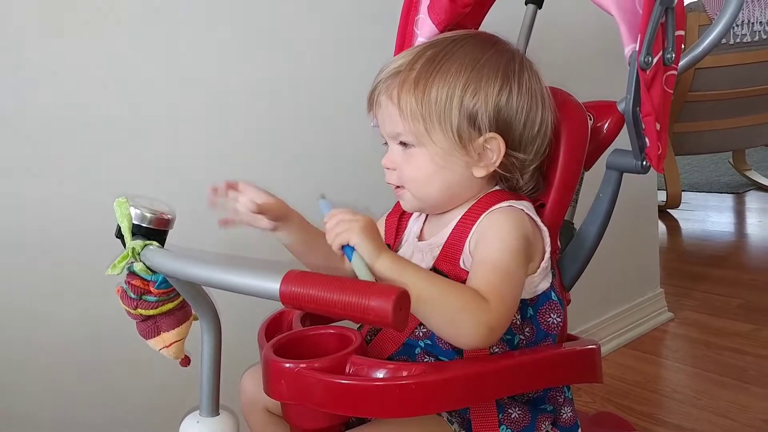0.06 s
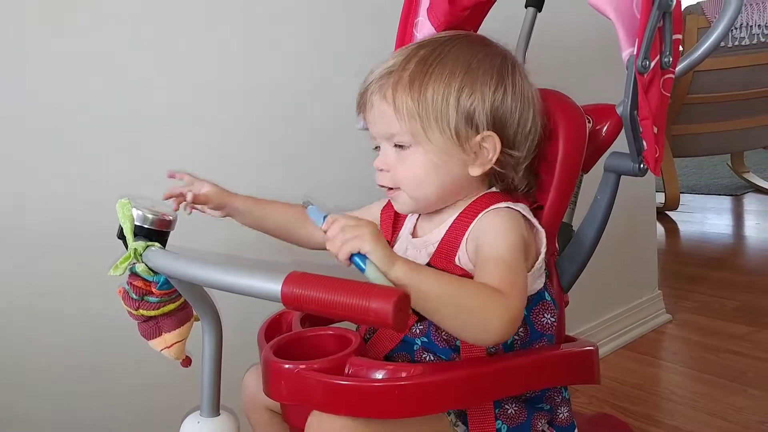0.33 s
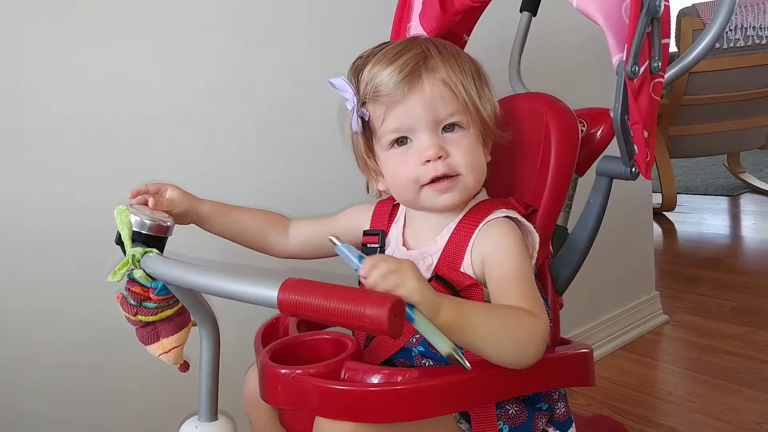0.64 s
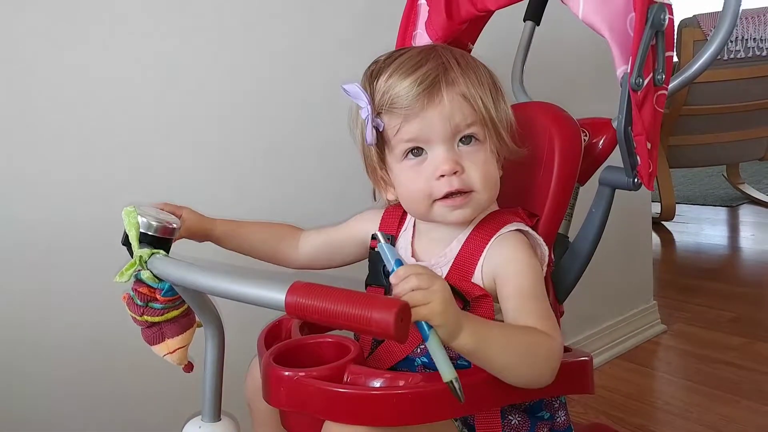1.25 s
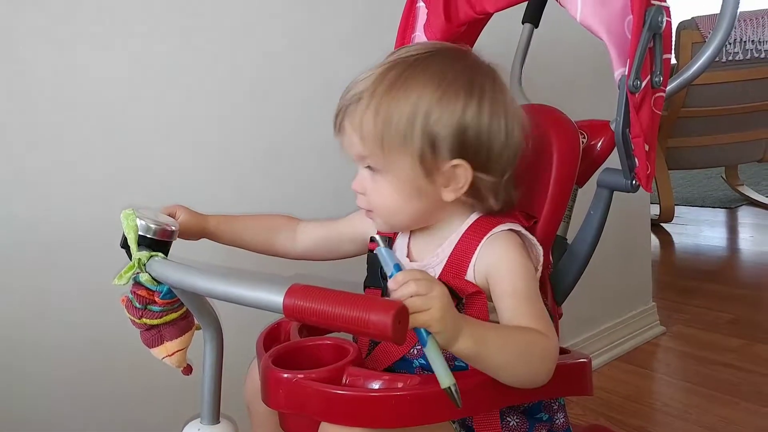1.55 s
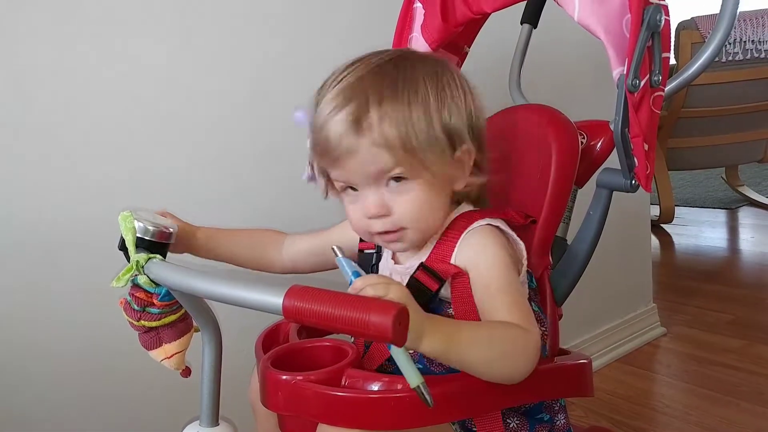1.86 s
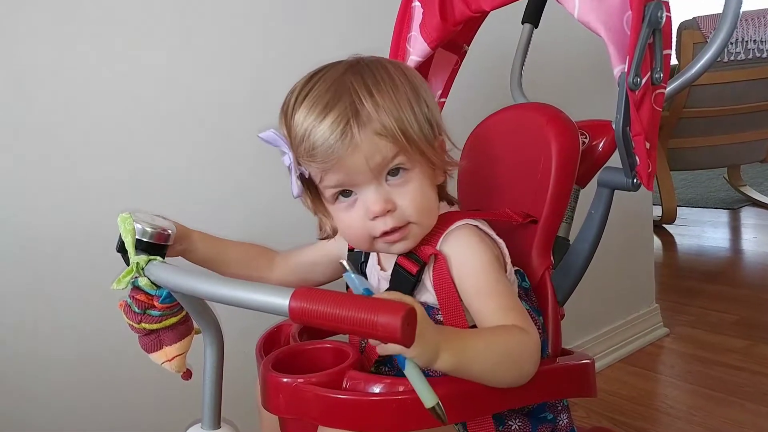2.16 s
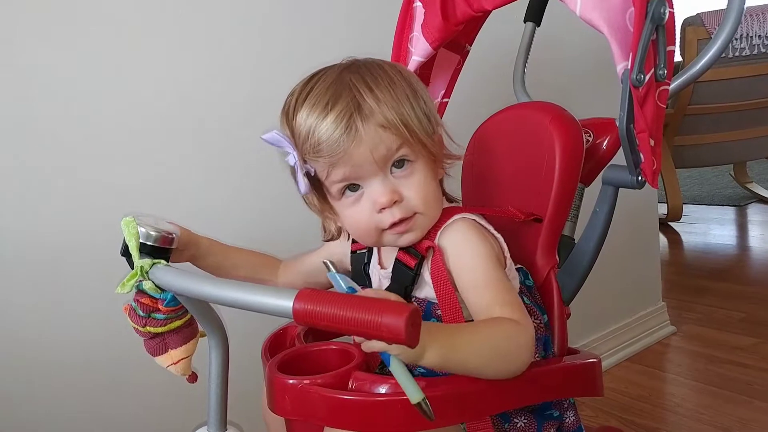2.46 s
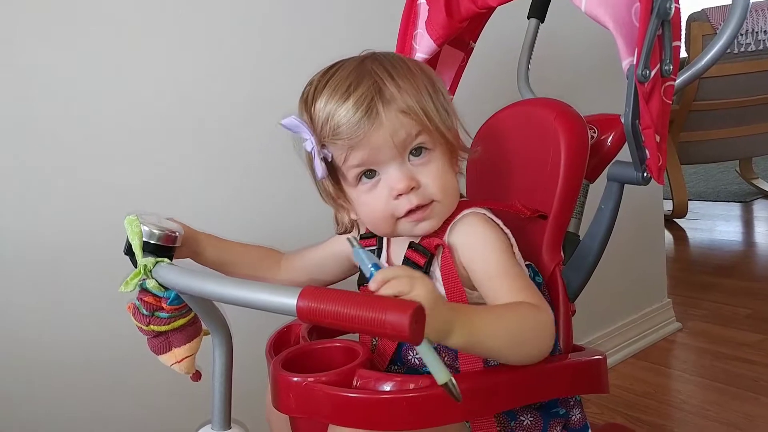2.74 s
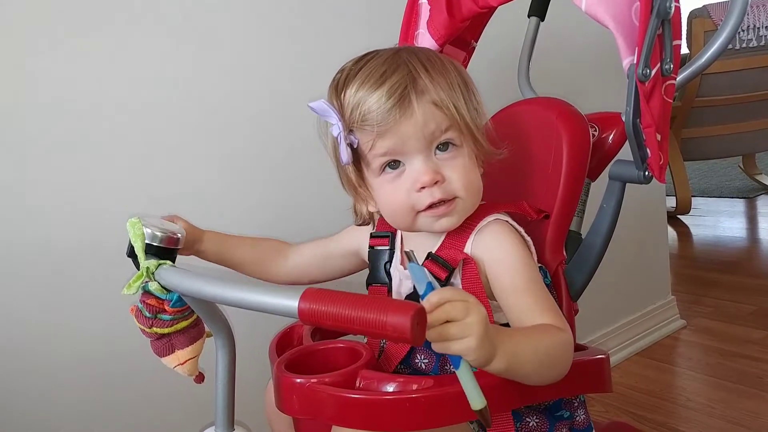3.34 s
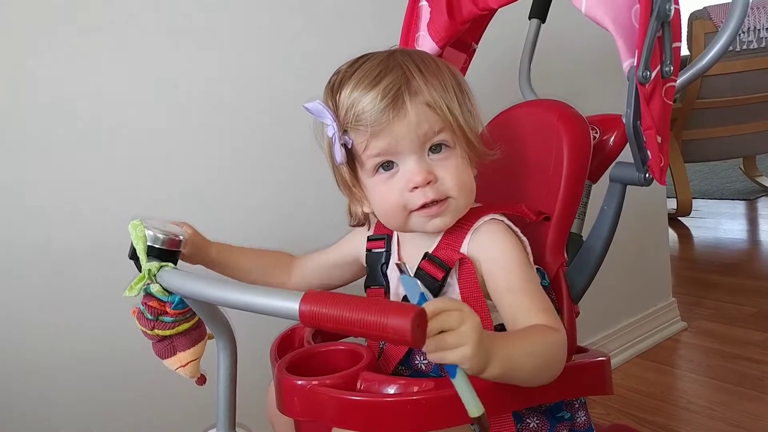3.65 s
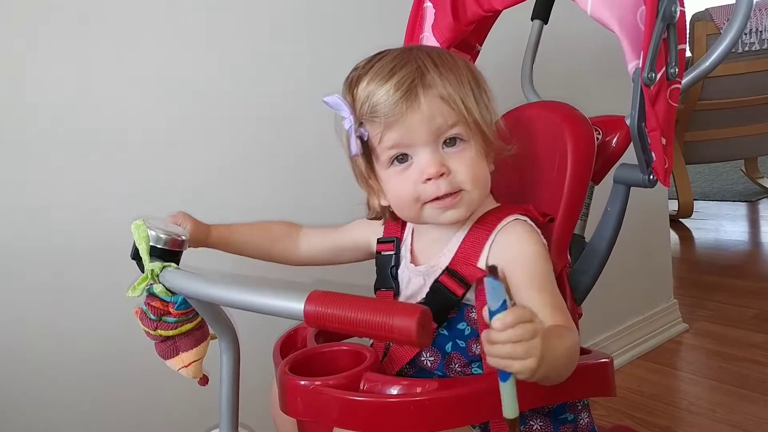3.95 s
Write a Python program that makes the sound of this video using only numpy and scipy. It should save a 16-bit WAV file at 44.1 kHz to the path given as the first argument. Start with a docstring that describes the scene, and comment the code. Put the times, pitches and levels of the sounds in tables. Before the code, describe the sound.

A small metal bell on a trike clicks faintly, then dings brightly several times, close up.

```python
"""A living room, where a small steel bell on a trike's handlebar is rung by hand, close up.
The lever clicks once, then flings the striker against the dome in quick clusters of bright dings.
The dome's paired modes beat and shimmer, the works rattle, the mount knocks and the room answers.
Faint handling sounds sit on a bed of air and low hum; a fast limiter catches the loudest dings."""
import sys
import numpy as np
from scipy import signal
from scipy.fft import rfft, irfft, next_fast_len
from scipy.io import wavfile
from scipy.ndimage import uniform_filter1d, minimum_filter1d, map_coordinates

SR = 44100
rng = np.random.default_rng(int(sys.argv[2]) if len(sys.argv) > 2 else 0)


def persist_wave(psi):
    """Save psi, clipped to +-1, as 16-bit WAV."""
    counts = np.round(np.clip(psi, -1, 1) * 32767).astype(np.int16)
    wavfile.write(sys.argv[1], SR, np.atleast_2d(counts).T)


N = 176400

# the dome's partials, most in close pairs: f/Hz
MODE_HZ = [1305, 2611, 3137.6, 3124, 4441, 5398.3, 5339.4, 6277, 8071.3, 7977, 11206, 11030, 13468, 14802,
           14520]
# their voicing, in the same order: level/dB, t60/s, left-right/dB, share of a strike's twin boost
DOME_MODES = [(-29, 1.3, -5.5, 0.21), (-61, 1.4, -3, 1), (-18, 1.81, -13.5, 0.2), (-34, 1.8, 15.5, 1),
              (-33.5, 0.72, -7, 1), (-12.5, 1.13, -8.5, 0.15), (-17.5, 1.57, 0, 0.88),
              (-43, 1.1, -10.5, 0.86), (-9.5, 0.62, -9.5, 0), (-20.5, 0.62, 18, 1), (-10, 0.32, 16, 0.33),
              (-15, 0.29, 11, 1), (-48, 0.43, -1.5, 0.88), (-5.5, 0.13, 11.5, 0.18), (-29, .25, -2.5, 1)]
# striker hits, each coloured by where it lands:
# t/s, ring/dB, twin boost/dB, tilt/(dB per octave), middle boost/dB, clack/dB, share of old ring kept
STRIKES = [(1.9932, 0.5, -6.5, 2, 4.5, -16.5, 1), (2.051, -0.5, -8, 1.5, -13, -28, 0.39),
           (3.0105, -4, -24.5, -2, 6.5, -25.5, 1), (3.0423, -3.5, 7.5, 0.5, 4.5, -14, 0.77),
           (3.0723, 4.5, 3, -1, -7, -13, 0.6), (3.3654, -5, -16, 9.5, 13, -14.5, 0.17),
           (3.412, 1, -7.5, 3, 1.5, -19.5, 0.32), (3.599, 3.5, 1.5, -0.5, 2, -9, 0.38),
           (3.666, 0.5, -7, 3.5, 9, -21, 0.83), (3.791, -1.5, 1, -0.5, -2, -20, 0.19)]
# the works rattling while the striker spins: t/s, level/dB, length/s
SPINS = [(1.995, -36.5, 0.077), (3.02, -27.5, 0.074), (3.37, -36.5, 0.067), (3.603, -25, 0.082)]
# the lever moving without a ding: t/s, level/dB, length/s
SCRAPES = [(1.945, -57, 0.044), (2.345, -51, 0.011), (2.606, -56, 0.013), (2.835, -66, .02),
           (3.5596, -32, .008), (3.9811, -47, .01)]
# colour of the clacks, rattles and scrapes: f/Hz, level/dB
WORKS_EQ = [(150, -27.5), (350, -13.5), (500, -3.5), (800, -11), (1500, -8.5), (2400, -7), (3400, -12.5),
            (4500, -3.5), (7000, 6), (9000, -6.5), (10500, 5), (13000, -5), (14700, 4.5), (16000, -16.5)]
# the housing's broad resonances: f/Hz, half width/Hz, gain/dB
HOUSING_PEAKS = [(520, 26, 3.5), (1850, 130, -0.5), (4550, 370, 6.5), (7150, 230, 3.5)]
# colour of the lever's click: f/Hz, level/dB
CLICK_EQ = [(590, -48), (1000, -24), (1320, -31), (1830, -22), (3890, -29), (5190, -7), (6700, -4),
            (8750, -14.5), (10400, -6.5), (16000, -32)]
# fingers brushing the bell: t/s, level/dB, length/s
RUBS = [(.6, -65.5, 0.11), (.72, -66.5, 0.097), (1.19, -70, 0.076)]
# colour of the brushing: f/Hz, level/dB
RUB_EQ = [(1500, -20), (4500, -5.5), (5800, -7), (6900, 4.5), (7800, -14), (11000, -22), (16000, -36)]
# a fingernail on the damped dome: t/s, level/dB
NAIL_TAPS = [(0.669, -56), (1.18, -65), (1.56, -68)]
# tiny plastic creaks: t/s, level/dB, f/Hz
CREAKS = [(0.602, -47, 1660), (.682, -45, 1586)]
# faint far-off tones: centre t/s, level/dB, f/Hz, half length/s
FAR_TONES = [(0.018, -62.5, 2390, 0.023), (0.173, -73, 2400, 0.18), (.47, -63.5, 2200, 0.061)]
# the room's decay: f/Hz, t60/s
ROOM_DECAY = [(300, 0.66), (2000, 0.48), (7000, 0.31), (11000, 0.29), (15000, .27)]
# colour of the room's air: f/Hz, level/dB
AIR_EQ = [(25, -34.5), (50, -5.5), (70, -1.5), (90, -12), (127, -22.5), (180, -18.5), (270, -16),
          (400, -24.5), (550, -14.5), (750, -22.5), (1000, -32.5), (1500, -38.5), (2200, -40.5),
          (4000, -47), (7000, -44), (9000, -51.5), (10500, -41), (12500, -51.5), (16000, -52)]
# the air's stereo image, narrow lows and wide highs: f/Hz, left-right correlation
AIR_CORRELATION = [(60, .94), (150, 1), (600, 0.64), (2000, 0.071), (8000, 0.042)]

MIDDLE_HZ, MIDDLE_OCTAVES = 5660, 0.14  # the band that answers most to where the striker lands
SPOT_DB = 2.1  # no two hits land on quite the same spot
BLOOM_DB, BLOOM_S = 6, 0.049  # the ring fills out just after each hit
ATTACK_S, LOW_ATTACK_S, LOW_BELOW_HZ = 0.00086, 0.0065, 4000  # lows build while the striker chatters
SPREAD_RAD, DRIFT_RAD = 1.61, 0.67  # a mode's left-right phase gap, and its scatter per hit
CLACK_T60, TICKS_PER_S, SCRAPE_TOP_HZ = 0.029, 730, 10040
WORKS_PAN_DB, WORKS_CROSSFEED = -1, 0.17
RIPPLE_DB, RIPPLE_STEP_HZ, RIPPLE_FULL_HZ = 3.5, 50, 1200  # the housing's fine resonances
KNOCK_HZ, KNOCK_T60, KNOCK_DB = 510, 0.076, -36.5
CLICK_AT_S, CLICK_DB, CLICK_T60, CLICK_PAN_DB = 0.1167, -22.5, 0.031, -4
NAIL_T60, NAIL_ABOVE_HZ, CREAK_T60 = 0.071, 7500, 0.015
RING_WET_DB, WORKS_WET_DB, LIGHT_WET_DB = -12.5, -1, -1
AIR_DB, HUM_HZ, HUM_WIDTH_HZ, HUM_DB = -49, 75.7, 10.5, -53
CEILING, HOLD_S, TOP_HZ = 1.0, 0.0017, 16300


def dome():
    """The hero ding: each hit keeps a share of the old ring, feeds every mode and nudges its phase."""
    t, out = np.arange(N) / SR, np.zeros((2, N))
    starts = [round(s * SR) for s, *_ in STRIKES] + [N]
    for hz, (db, t60, pan_db, twin) in zip(MODE_HZ, DOME_MODES):
        octaves = np.log2(hz / MIDDLE_HZ)
        middle = np.exp(-(octaves / MIDDLE_OCTAVES) ** 2)
        attack_s = LOW_ATTACK_S if hz < LOW_BELOW_HZ else ATTACK_S
        phase = rng.uniform(0, 2 * np.pi)
        spread = rng.choice([-1, 1]) * SPREAD_RAD
        ringing = 0
        for strike, a, b in zip(STRIKES, starts, starts[1:]):
            _, ring_db, twin_db, tilt_db, middle_db, _, kept = strike
            age = t[:b - a]
            old_ring = kept * ringing
            colour_db = twin * twin_db + tilt_db * octaves + middle_db * middle
            hit_db = db + ring_db + colour_db + SPOT_DB * rng.standard_normal()
            bloom = amp(hit_db - BLOOM_DB * np.exp(-age / BLOOM_S))
            new_ring = bloom * (1 - np.exp(-age / attack_s))
            envelope = np.hypot(old_ring, new_ring) * np.exp(-np.log(1000) * age / t60)
            phase += rng.uniform(-1, 1) * np.arctan2(bloom[0], old_ring)
            stereo_phase = np.array([[0.5], [-0.5]]) * (spread + DRIFT_RAD * rng.standard_normal())
            out[:, a:b] += pan(pan_db) * envelope * np.sin(2 * np.pi * hz * t[a:b] + phase + stereo_phase)
            ringing = envelope[-1]
    return out


def works():
    """The mechanical layer: striker clacks, spinning gears and duller lever scrapes in one housing."""
    clacks = sum(amp(db) * fall(s, CLACK_T60) for s, *_, db, _ in STRIKES)
    scrapes = noise(WORKS_EQ) * rattle(SCRAPES)
    dull_scrapes = filtered(scrapes, lambda hz: 1 / (1 + (hz / SCRAPE_TOP_HZ) ** 4))
    drive = noise(WORKS_EQ) * np.hypot(clacks, rattle(SPINS)) + dull_scrapes
    return pan(WORKS_PAN_DB) * housing(drive + WORKS_CROSSFEED * drive[::-1])


def rattle(bursts):
    """A gritty envelope: tiny uneven ticks, gated into bursts."""
    t = np.arange(N) / SR
    ticks = (rng.random(N) < TICKS_PER_S / SR) * rng.uniform(0.17, 1, N)
    grit = unit(signal.lfilter([1], [1, -np.exp(-1 / (0.0021 * SR))], ticks))
    gate = np.zeros(N)
    for s, db, length in bursts:
        attack = np.clip((t - s) / 0.0033, 0, 1)
        release = np.exp(-np.maximum(t - s - length, 0) / 0.01)
        gate += amp(db) * attack * release
    return (0.13 + grit) * gate


def housing(x, size=8192):
    """The housing adds body: a few broad resonances, with many finer ones in the treble."""
    hz = np.fft.rfftfreq(size, 1 / SR)
    ripple = map_coordinates(rng.standard_normal(2000), [hz / RIPPLE_STEP_HZ], mode="mirror")
    fine_db = RIPPLE_DB * ripple * np.minimum(1, hz / RIPPLE_FULL_HZ)
    broad_db = sum(db / (1 + ((hz - f) / width) ** 2) for f, width, db in HOUSING_PEAKS)
    # minimum phase, so the ringing follows each transient
    cepstrum = irfft(np.log(amp(fine_db + broad_db)))
    fold = np.r_[1, np.full(size // 2 - 1, 2), np.zeros(size // 2)]
    impulse = irfft(np.exp(rfft(cepstrum * fold)))
    return signal.fftconvolve(x, impulse[None], axes=1)[:, :N]


def mount_knocks():
    """Every hit gives the mount a short, hollow knock."""
    t = np.arange(N) / SR
    knocks = sum(fall(s, KNOCK_T60) * np.sin(2 * np.pi * KNOCK_HZ * (t - s)) for s, *_ in STRIKES)
    return amp(KNOCK_DB) * knocks


def lever_click():
    """A light plastic click that leaves the dome silent."""
    return pan(CLICK_PAN_DB) * amp(CLICK_DB) * fall(CLICK_AT_S, CLICK_T60) * noise(CLICK_EQ)


def handling():
    """Close foley: fingers brush the bell, a nail tinkles its top modes and plastic creaks."""
    t = np.arange(N) / SR
    top_modes = unit(sum(np.sin(2 * np.pi * hz * t) for hz in MODE_HZ if hz > NAIL_ABOVE_HZ))
    tinkles = top_modes * sum(amp(db) * fall(s, NAIL_T60) for s, db in NAIL_TAPS)
    creaks = sum(amp(db) * fall(s, CREAK_T60) * np.sin(2 * np.pi * hz * t) for s, db, hz in CREAKS)
    return noise(RUB_EQ) * rattle(RUBS) + tinkles + creaks


def far_tones():
    """Faint pure tones swell and fade in the distance."""
    t = np.arange(N) / SR
    return sum(amp(db) * np.exp(-((t - s) / half) ** 2) * np.sin(2 * np.pi * hz * t)
               for s, db, hz, half in FAR_TONES)


def in_room(x, wet_db):
    """The direct sound plus a short room tail whose treble dies first."""
    hz, t, spectra = signal.stft(rng.standard_normal((2, SR * 3 // 4)), SR, nperseg=256)
    decay = np.exp(-np.log(1000) * t / along(ROOM_DECAY, hz)[:, None])
    _, tail = signal.istft(spectra * decay, SR, nperseg=256)
    tail = np.pad(tail, ((0, 0), (130, 0)))  # 3 ms pre-delay
    return x + amp(wet_db) * signal.fftconvolve(x, tail / np.linalg.norm(tail[0]), axes=1)[:, :N]


def room_tone():
    """The bed: soft air over a low, wavering hum."""
    def mid_side_gains(hz):
        angle = np.arccos(along(AIR_CORRELATION, hz)) / 2
        return np.array([np.cos(angle), np.sin(angle)])

    mid, side = filtered(noise(AIR_EQ), mid_side_gains)
    air = np.array([mid + side, mid - side])
    hum = filtered(rng.standard_normal(N), lambda hz: 1 / (1 + ((hz - HUM_HZ) / HUM_WIDTH_HZ) ** 2))
    return amp(AIR_DB) * unit(air) + amp(HUM_DB) * unit(hum)


def amp(db):
    """Decibels to gain."""
    return 10 ** (np.asarray(db) / 20)


def unit(x):
    """x at an rms of 1."""
    return x / np.sqrt(np.mean(x ** 2) + 1e-20)


def along(points, hz):
    """A breakpoint curve read on a log frequency axis."""
    point_hz, values = np.transpose(points)
    return np.interp(np.log(hz + 1), np.log(point_hz + 1), values)


def pan(db):
    """Stereo gains for a level difference; positive leans left."""
    return amp(np.array([[db], [-db]]) / 2)


def filtered(x, response):
    """Zero-phase EQ with the gain response(hz)."""
    size = next_fast_len(N + SR // 2)
    return irfft(rfft(x, size) * response(np.fft.rfftfreq(size, 1 / SR)), size)[..., :N]


def noise(eq):
    """Wide stereo noise, coloured by an EQ curve, at an rms of 1."""
    return unit(filtered(rng.standard_normal((2, N)), lambda hz: amp(along(eq, hz))))


def fall(s, t60):
    """A percussive envelope that jumps to 1 at time s and dies away."""
    age = np.arange(N) / SR - s
    return (age >= 0) * np.exp(-np.log(1000) * np.maximum(age, 0) / t60)


def scene():
    """The mix: a fairly dry ring up front, wetter mechanics and light details, room tone beneath."""
    light = lever_click() + handling() + far_tones()
    ring = in_room(dome(), RING_WET_DB)
    mechanics = in_room(works() + mount_knocks(), WORKS_WET_DB)
    return ring + mechanics + in_room(light, LIGHT_WET_DB) + room_tone()


def record(dry):
    """The master chain: a fast peak limiter, then a steep low-pass."""
    hold = int(HOLD_S * SR)
    needed = np.minimum(1, CEILING / (np.abs(dry).max(axis=0) + 1e-9))
    gain = uniform_filter1d(minimum_filter1d(needed, hold), hold)
    return filtered(dry * gain, lambda hz: 1 / (1 + (hz / TOP_HZ) ** 120))


dry = scene()
out = record(dry)
persist_wave(out)
```